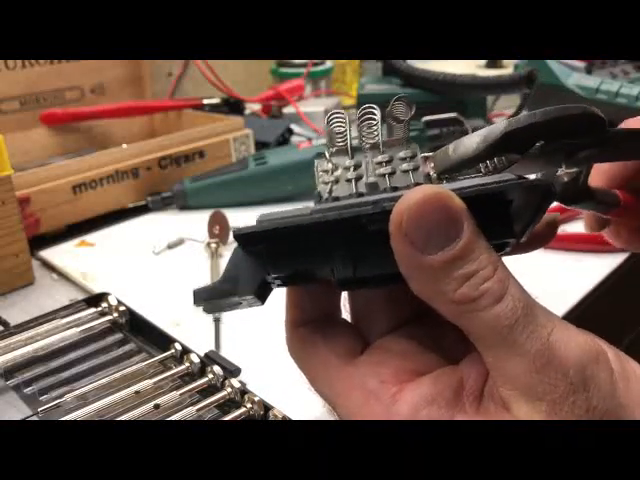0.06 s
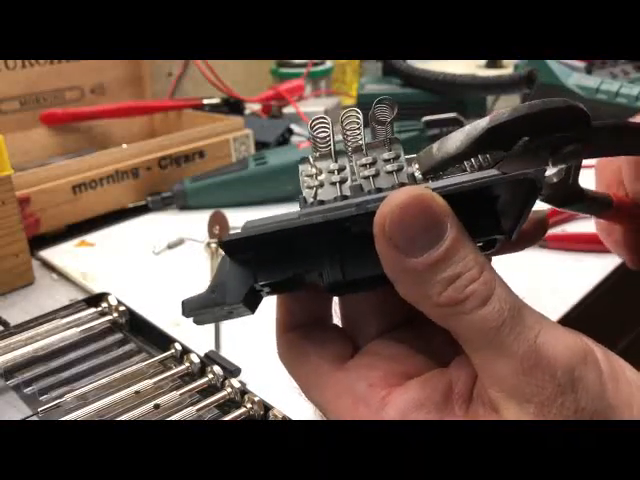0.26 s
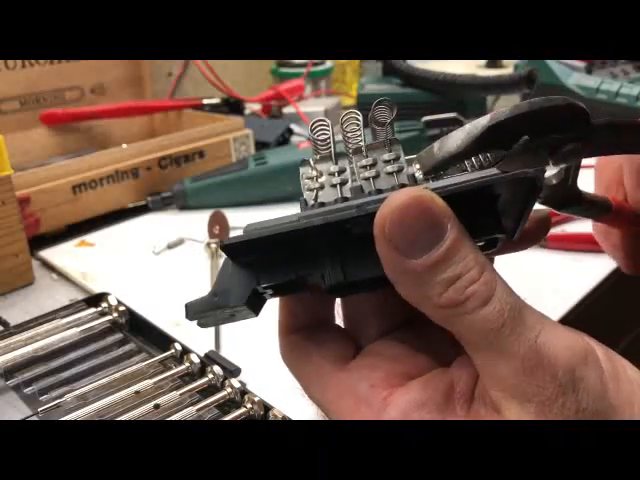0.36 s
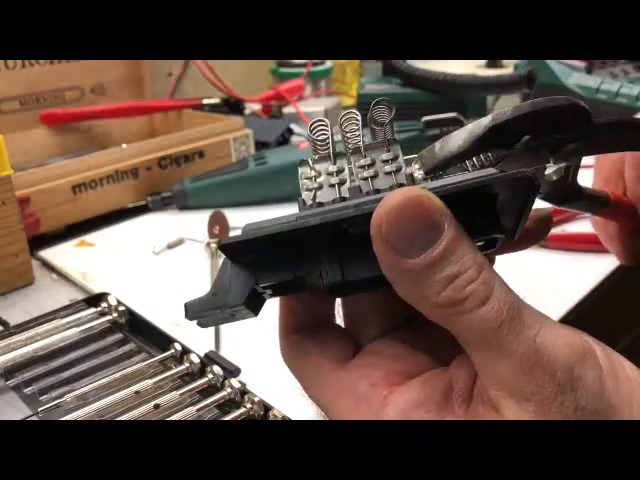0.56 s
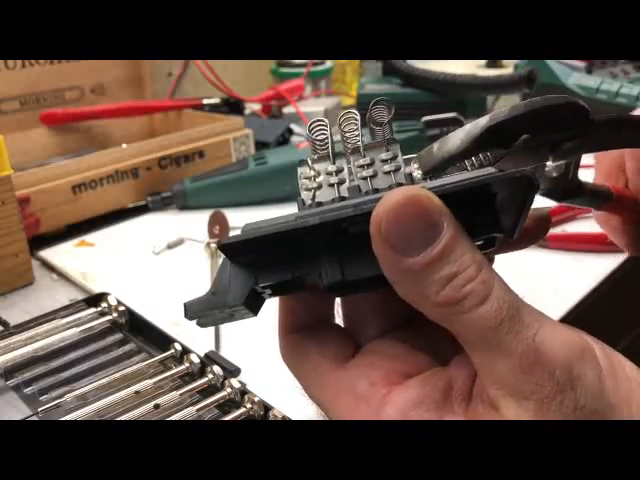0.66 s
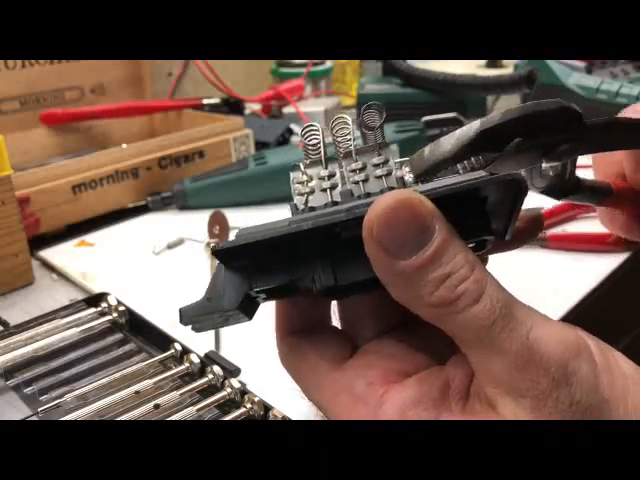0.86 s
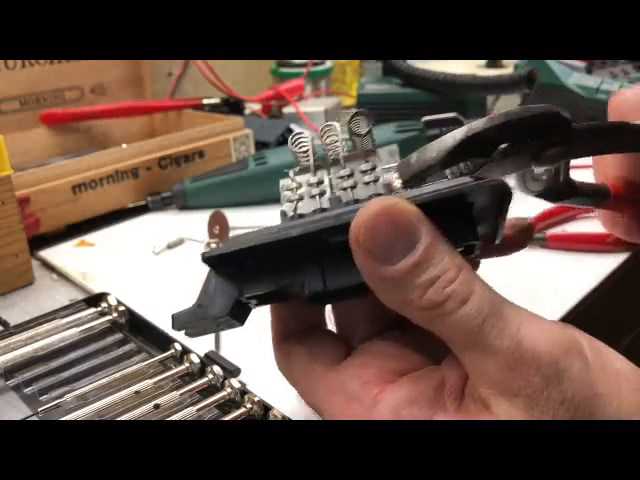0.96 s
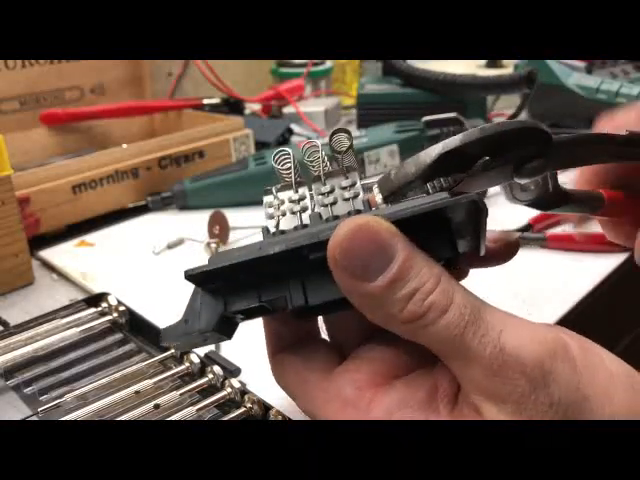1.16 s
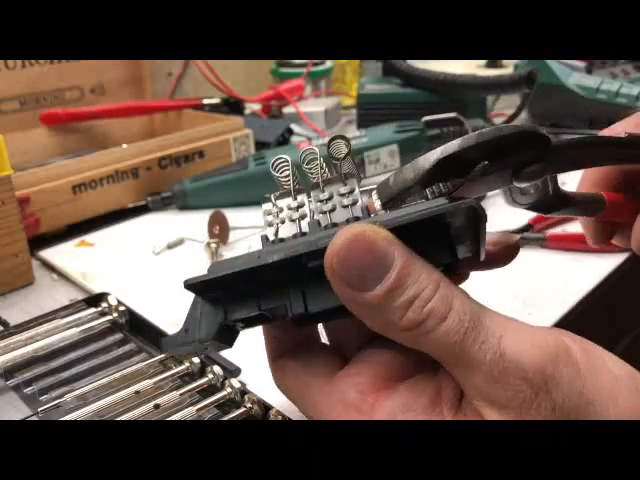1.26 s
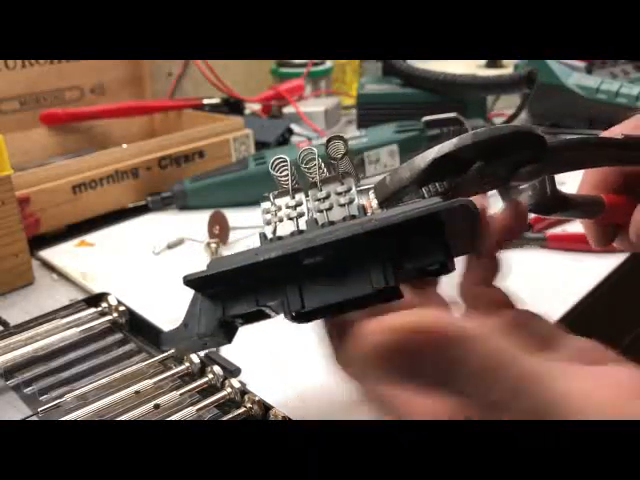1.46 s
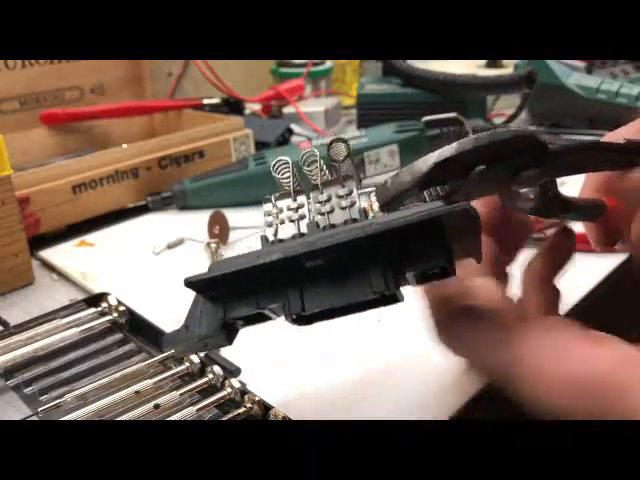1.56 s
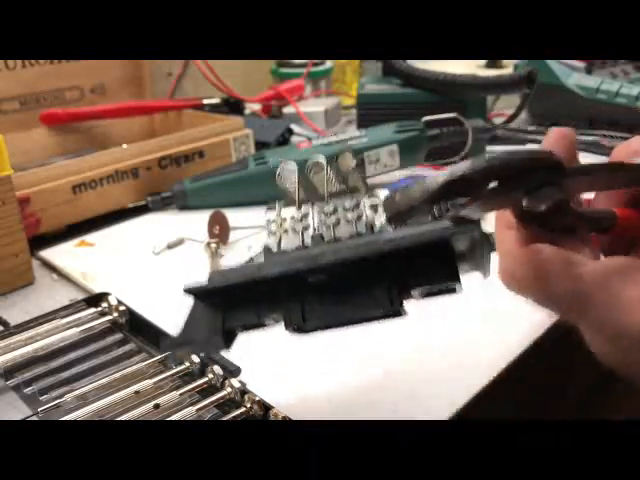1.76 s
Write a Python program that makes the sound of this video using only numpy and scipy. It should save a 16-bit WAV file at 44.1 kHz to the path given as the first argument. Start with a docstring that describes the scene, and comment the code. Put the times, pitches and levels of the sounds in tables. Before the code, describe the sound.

Pliers squeeze a small metal terminal: light ticks, then one sharp metallic snap and a smaller tap. Faint ticks and soft rubs of fingers on a plastic block follow, close by in a quiet, dry room.

```python
"""Pliers squeeze a small metal leg onto a terminal of a hand-held plastic block, close by, in a small,
dry, quiet room. Light ticks come first. At 0.15 s the jaws seat with a tap that rings a spring.
At 0.24 s they slip shut with one sharp snap: metal cracks, the jaws ring, the block jolts.
They tap again at 0.45 s and faintly at 1.12 s. From about 1.1 s the grip changes: small ticks,
soft rubs of skin on plastic and a low shudder of the hands."""
import sys
import numpy as np
from scipy import signal
from scipy.fft import rfft, irfft, next_fast_len
from scipy.io import wavfile
from scipy.ndimage import uniform_filter1d

SR = 44100
rng = np.random.default_rng(int(sys.argv[2]) if len(sys.argv) > 2 else 0)


def transcribe(signal):
    """Save signal, clipped to [-1, 1], as a 16-bit WAV file at the path in sys.argv[1]."""
    frames = np.atleast_2d(signal).T
    limited = np.clip(frames, -1, 1)
    pcm = np.round(limited * 32767).astype(np.int16)
    wavfile.write(sys.argv[1], SR, pcm)


N = 79380

# modes of the jaws and the block they hold: pitch_hz, relative_db, t60_s
JAW_BLOCK_MODES = [(560, -3.5, .01), (723, -6, .025), (860, -9, .023), (1004, -4.5, .052), (1278, -6, .03),
                   (1510, -5, 0.033), (1657, -7, 0.021), (1944, -1, 0.019), (2370, -7, 0.028),
                   (2700, -3, .021), (3115, -1.5, 0.02), (3422, 2.5, 0.015), (3644, -3, 0.028),
                   (3800, -4, 0.047), (4180, -8.5, 0.021), (5330, 2.5, .012), (6340, -3, 0.015),
                   (7210, 2.5, .008), (7800, -12, 0.0089), (8220, -2.5, 0.013), (10400, -8.5, 0.01),
                   (11950, -14, .015), (13250, -13, .013)]


def amp(db):
    """Decibels to gain."""
    return 10 ** (np.asarray(db) / 20)


def unit(x):
    """Scale to rms 1."""
    return x / np.sqrt(np.mean(x ** 2) + 1e-20)


def along(points, hz):
    """Interpolate (hz, value) points on a log-frequency axis."""
    points_hz, values = np.transpose(points)
    return np.interp(np.log(hz + 1), np.log(points_hz + 1), values)


def noise(response):
    """Noise of rms 1, coloured by the gain response(hz)."""
    size = next_fast_len(N + SR // 2)
    white = rfft(rng.standard_normal(N), size)
    return unit(irfft(white * response(np.fft.rfftfreq(size, 1 / SR)), size)[:N])


def band(hz, centre_hz, width_oct):
    """Bell on a log-frequency axis."""
    return np.exp(-.5 * (np.log2((hz + 1) / centre_hz) / width_oct) ** 2)


def since(start_s):
    """Seconds since start_s, zero before."""
    return np.maximum(np.arange(N) / SR - start_s, 0)


def fade(t, t60_s, rise_s):
    """Quick rise, exponential decay."""
    return np.exp(-np.log(1000) * t / t60_s) * (1 - np.exp(-t / rise_s))


def swell(start_s, length_s):
    """Envelope of one rounded stroke."""
    return np.sqrt(np.abs(np.sin(np.pi * np.minimum(since(start_s) / length_s, 1))))


def ring(start_s, modes, rise_s):
    """Struck damped modes, alternating in sign; bending waves bring the high ones first."""
    out = np.zeros(N)
    for k, (hz, db, t60_s) in enumerate(modes):
        travel_s = .00023 * np.sqrt(1000 / hz)
        t = since(start_s + travel_s)[:round((start_s + 2 * t60_s) * SR)]
        out[:len(t)] += (-1) ** k * amp(db) * fade(t, t60_s, rise_s) * np.sin(2 * np.pi * hz * t)
    return out


def background():
    """Steady room air and a faint hum."""
    # air spectrum: frequency_hz, density_db
    air_spectrum = [(12, -34.5), (20, -4), (42, -1.5), (98, -5.5), (126, -9.5), (232, -13), (393, -15),
                    (649, -20), (1540, -26), (2840, -31), (3850, -30.5), (13900, -39), (15500, -46)]
    # hum tones: pitch_hz, rms_db
    hum_tones = [(39, -71), (120, -72)]
    hum = sum(amp(db) * np.sqrt(2) * np.sin(2 * np.pi * (hz * since(0) + rng.random()))
              for hz, db in hum_tones)
    return amp(-61.5) * noise(lambda hz: amp(along(air_spectrum, hz))) + hum


def ticks():
    """Tiny slips of metal and plastic: noise bursts, each in its own band with a weak skirt."""
    # contacts of jaws, terminal and block: start_s, level_db, centre_hz, width_oct, t60_s
    contacts = [(0.0484, -56.5, 4750, 0.89, 0.013), (0.1233, -58, 3100, .4, 0.019),
                (.1455, -50.5, 3430, 0.83, 0.056), (0.207, -43.5, 2450, 0.82, 0.011),
                (0.2124, -52.5, 2200, .9, 0.017), (0.4379, -55, 4170, 0.29, 0.025),
                (0.4475, -40, 2300, .8, .012), (0.736, -58, 2440, 0.85, .022),
                (0.7617, -54, 3020, 0.9, .012), (1.0916, -60, 7010, 1.18, 0.013),
                (1.1154, -53.5, 8600, 0.39, 0.014), (1.122, -55, 3000, 1.07, 0.048),
                (1.1924, -61, 2030, .5, .035), (1.2654, -50, 2700, 0.8, .016),
                (1.277, -60.5, 7000, 1.1, 0.033), (1.3049, -49.5, 2460, 0.28, 0.028),
                (1.416, -58.5, 3200, 0.37, 0.033), (1.438, -60, 3790, 0.44, .015),
                (1.4624, -59, 3570, 1.2, 0.034), (1.470, -43.5, 3500, 0.39, .011),
                (1.497, -47.5, 3000, 0.49, 0.013), (1.533, -54.5, 1310, 1.5, 0.05),
                (1.5846, -47.5, 6600, 0.67, 0.019)]
    skirt_db, skirt_oct = -19.5, 1.3
    out = np.zeros(N)
    for start_s, db, centre_hz, width_oct, t60_s in contacts:
        hiss = noise(lambda hz: band(hz, centre_hz, width_oct)
                     + amp(skirt_db) * band(hz, centre_hz, skirt_oct))
        out += amp(db) * fade(since(start_s), t60_s, rise_s=.00022) * hiss
    return out


def taps():
    """The jaw tips click; jaw modes near that pitch and the block's low modes ring on."""
    # gentle jaw contacts: start_s, ring_gain_db, click_db
    strikes = [(.1457, -51.5, -41.5), (0.4475, -40.5, -31.5), (1.1234, -52.5, -45)]
    tip_hz, block_hz, click_t60_s = 3884, 877.3, .01
    modes = []
    for hz, db, t60_s in JAW_BLOCK_MODES:
        weight = band(hz, tip_hz, width_oct=.068) + band(hz, block_hz, width_oct=.2) + 1e-6
        modes.append((hz, db + 20 * np.log10(weight), t60_s))
    out = np.zeros(N)
    for start_s, ring_gain_db, click_db in strikes:
        out += ring(start_s, [(tip_hz, click_db, click_t60_s)], rise_s=.0001)
        out += amp(ring_gain_db) * ring(start_s, modes, rise_s=.00035)
    return out


def spring(start_s):
    """One spring shimmers as the jaws seat; its closely paired modes beat."""
    # spring modes: pitch_hz, level_db, t60_s
    modes = [(2213, -63, 0.11), (3780, -65, .12), (5350, -70, .18), (6400, -68, .3), (7580, -62.5, .13),
             (9100, -64, .12), (10950, -61.5, .11), (12400, -71, .07)]
    beat_hz, pair_gain_db = 55, -6
    paired_modes = [(hz + beat_hz, db + pair_gain_db, t60_s) for hz, db, t60_s in modes]
    return ring(start_s, modes, rise_s=.0018) - ring(start_s, paired_modes, rise_s=.002)


def shudders():
    """The moving hands shudder: swells of low rumble."""
    # hand movements: start_s, length_s, level_db
    moves = [(0.226, 0.16, -61.5), (1.23, 0.12, -56), (1.437, 0.15, -54.5)]
    # rumble spectrum: frequency_hz, density_db
    spectrum = [(15, -12), (36, 1), (60, -9.5), (150, -18), (400, -30.5), (1500, -72)]
    out = np.zeros(N)
    for start_s, length_s, db in moves:
        out += amp(db) * swell(start_s, length_s) * noise(lambda hz: amp(along(spectrum, hz)))
    return out


def snap(start_s):
    """The jaws slip shut and ring; the block jolts in the hand."""
    # block's thud: pitch_hz, level_db, t60_s
    thud_modes = [(75, -56.5, .25), (180, -52.5, .08), (255, -48, .1), (305, -49, 0.11)]
    radiation = signal.butter(2, 551.6, "high", fs=SR, output="sos")  # small jaws radiate little bass
    jaws = signal.sosfilt(radiation, ring(start_s, JAW_BLOCK_MODES, rise_s=.00007))
    return amp(-15) * jaws + ring(start_s, thud_modes, rise_s=.004)


def crack(start_s):
    """Metal gives way at the snap: a short, dense noise burst."""
    # burst spectrum: frequency_hz, density_db
    spectrum = [(100, -21.5), (280, -13), (500, -1), (1200, 1.5), (3200, -0.5), (4600, -4), (6500, -5),
                (8600, -2), (9800, -5.5), (12000, -10), (15500, -13)]
    burst = noise(lambda hz: amp(along(spectrum, hz)))
    return amp(-21) * burst * fade(since(start_s), t60_s=.025, rise_s=.0003)


def rubs():
    """Skin slides over the block: grainy hiss."""
    # skin strokes: start_s, length_s, level_db, treble_tilt_db_per_oct
    strokes = [(1.106, .06, -65.5, 7), (1.468, 0.1, -61.5, 5), (1.564, 0.15, -62, 5.5),
               (1.761, .07, -62.5, 8)]
    # friction spectrum before tilt: frequency_hz, density_db
    spectrum = [(200, -12), (600, 16.5), (1500, 1.5), (2500, 2), (4200, 1.5), (7000, -8), (11000, -13.5),
                (15000, -14)]
    grain_db = 2
    out = np.zeros(N)
    for start_s, length_s, db, tilt_db_per_oct in strokes:
        grain = amp(grain_db * unit(uniform_filter1d(rng.standard_normal(N), size=90)))
        hiss = noise(lambda hz: amp(along(spectrum, hz) + tilt_db_per_oct * np.log2(1 + hz / 1000)))
        out += amp(db) * swell(start_s, length_s) * unit(grain * hiss)
    return out


def room(x):
    """Short diffuse reflections of x from the workshop walls."""
    # reverberation time: frequency_hz, t60_s
    decay_times = [(200, 0.23), (530, 0.22), (1400, 0.13), (3700, .16), (9700, .14), (15000, 0.15)]
    # colour of the reflections: frequency_hz, relative_db
    colour = [(120, 7), (280, 8), (500, -1), (900, 2), (2200, 3), (3500, -2), (5000, 2), (9000, -2),
              (15000, -8)]
    delay_s, build_s = .0115, .00074
    hz, t, white = signal.stft(rng.standard_normal(SR // 2), SR, nperseg=256)
    decay = np.exp(-np.log(1000) * t / along(decay_times, hz)[:, None])
    tail = signal.istft(white * decay * amp(along(colour, hz))[:, None], SR, nperseg=256)[1]
    tail *= 1 - np.exp(-since(delay_s)[:len(tail)] / build_s)
    return signal.fftconvolve(x, tail / np.linalg.norm(tail))[:N]


def scene():
    """Mono mix; the room answers mostly to the crack."""
    seat_s, snap_s = .147, .2355
    burst = crack(snap_s)
    handling = ticks() + taps() + spring(seat_s) + snap(snap_s) + rubs() + shudders()
    reflections = room(burst + amp(-22) * handling)
    return (burst + handling + amp(-5) * reflections + background())[None]


def record(dry):
    """Steep low-pass on the top treble."""
    cutoff_hz = 15350
    return signal.sosfilt(signal.ellip(10, .1, 80, cutoff_hz, fs=SR, output="sos"), dry)


dry = scene()
out = record(dry)
transcribe(out)
```